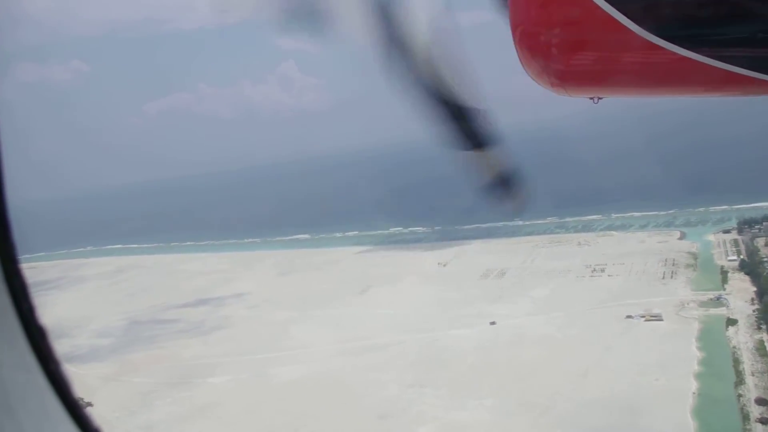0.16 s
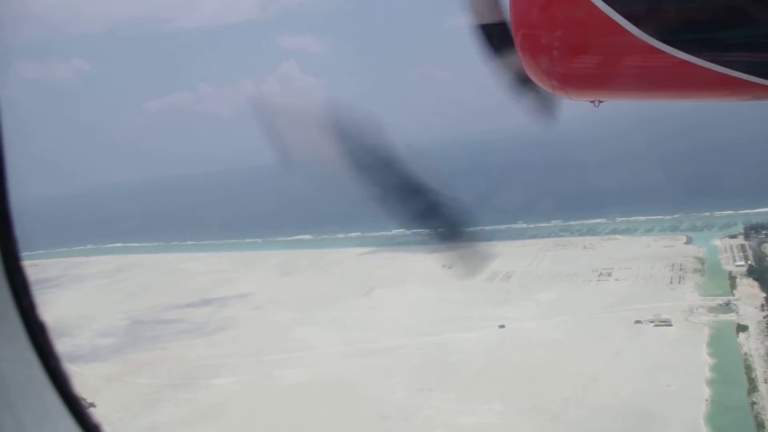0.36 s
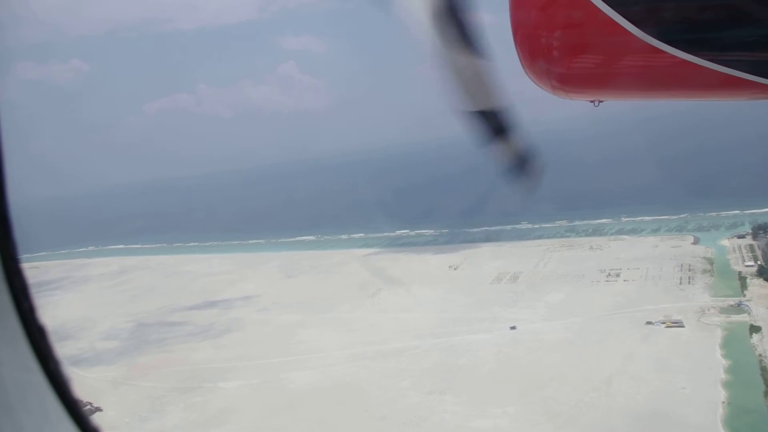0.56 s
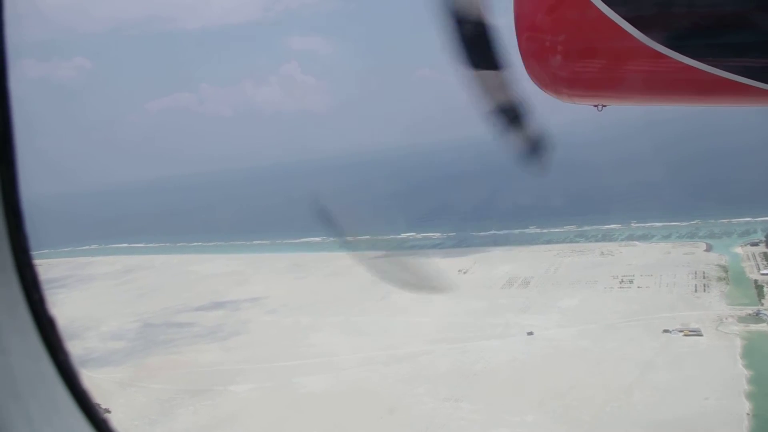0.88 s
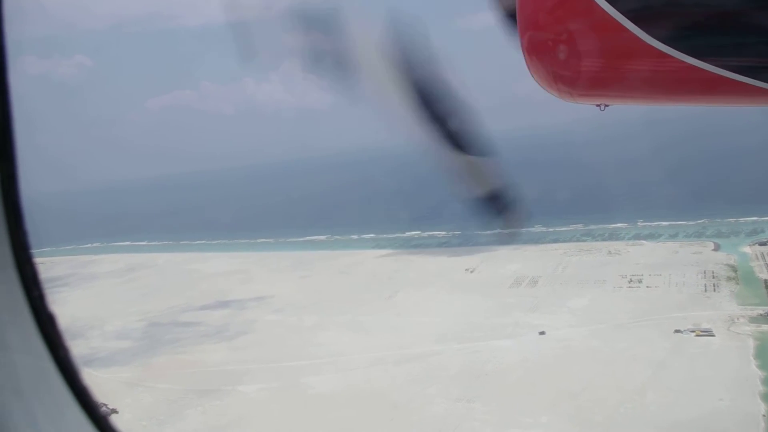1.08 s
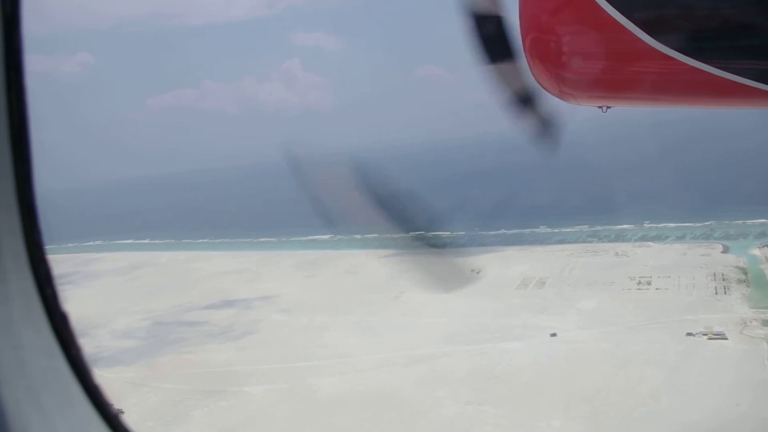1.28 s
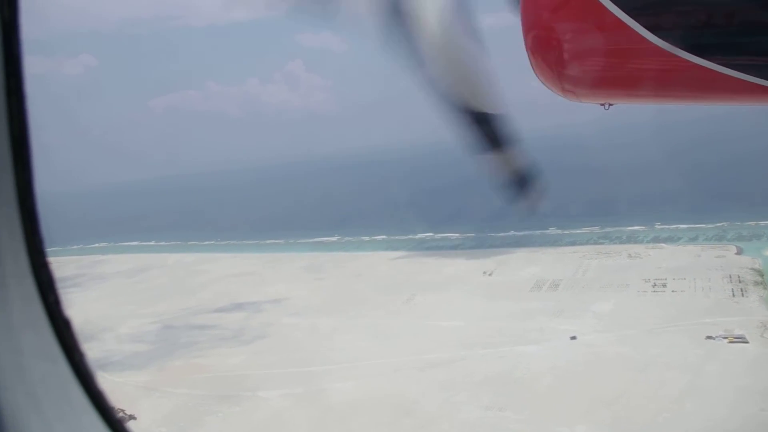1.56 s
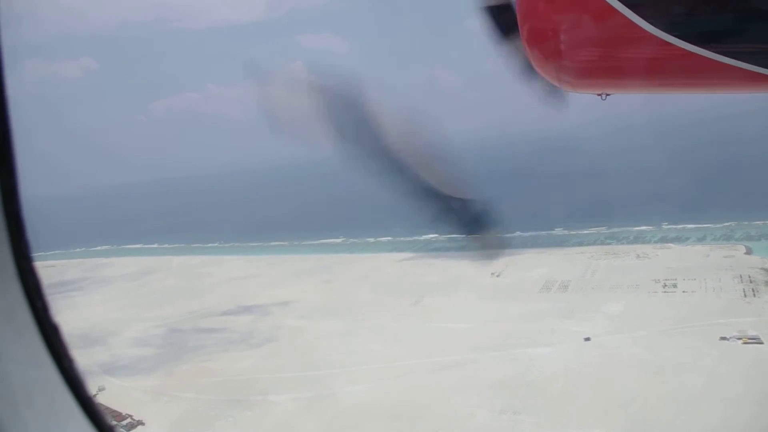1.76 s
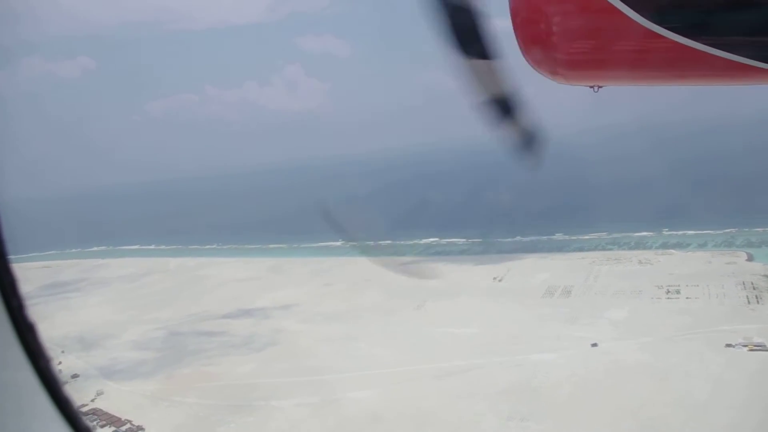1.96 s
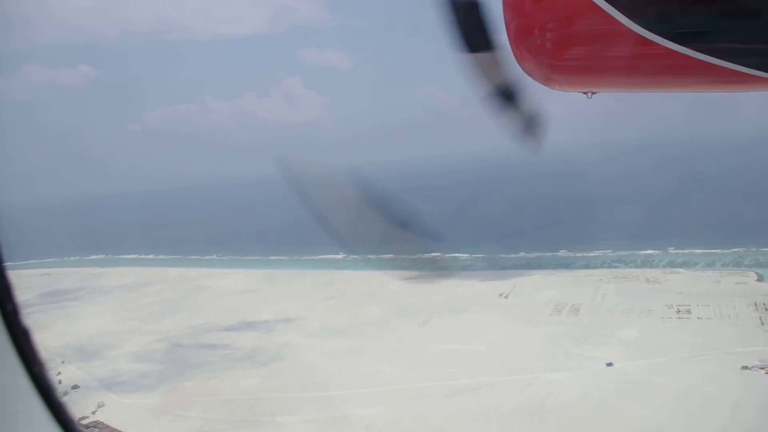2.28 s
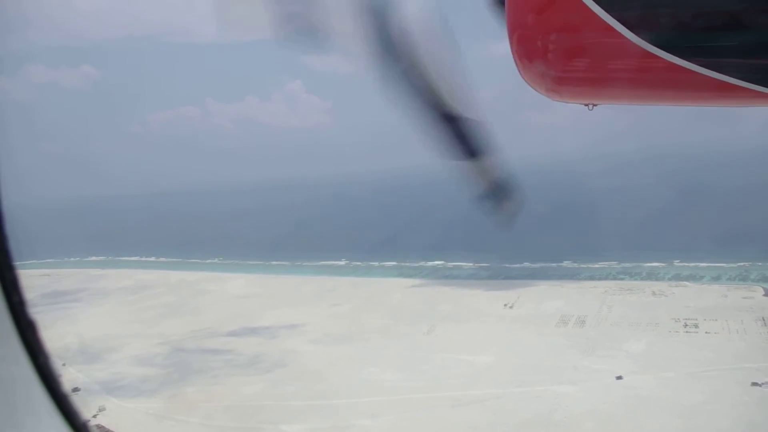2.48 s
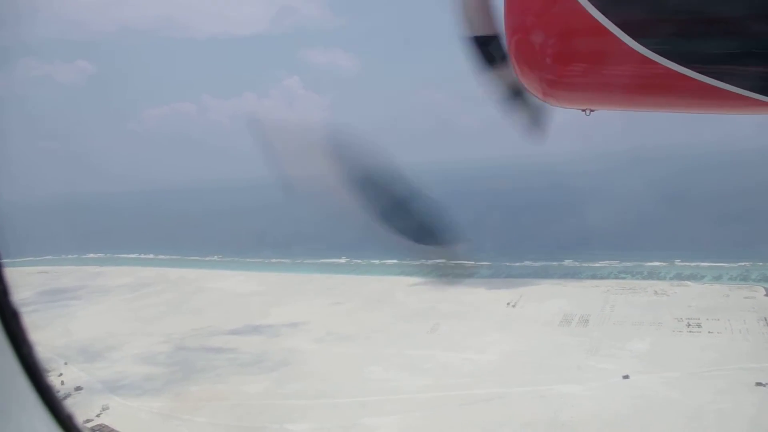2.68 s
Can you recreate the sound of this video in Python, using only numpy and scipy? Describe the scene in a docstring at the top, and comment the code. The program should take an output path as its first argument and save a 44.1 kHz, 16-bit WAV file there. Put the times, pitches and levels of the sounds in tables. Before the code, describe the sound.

Deep buzzing propeller engine hum fills a small plane in flight, under airy roar and faint high hiss

```python
"""A steady propeller drone fills the cabin of a small twin turboprop in flight: two three-bladed
propellers turn almost in step, as sums of sines at multiples of their shaft rates.
Blades of the near propeller slap the fuselage with suction spikes and puffs of noise. Shaped noise
makes the rush of air, which swells in steps and eases at the end. Gears sing faintly as wavering sines,
and the turbine whines and hisses high above as bands of noise with compressor tones."""
import sys
import numpy as np
from scipy import signal
from scipy.fft import rfft, irfft, next_fast_len
from scipy.io import wavfile
from scipy.ndimage import map_coordinates

SR = 44100
rng = np.random.default_rng(int(sys.argv[2]) if len(sys.argv) > 2 else 0)


def persist_wave(psi):
    """Save psi, clipped to +-1, as 16-bit WAV."""
    counts = np.round(np.clip(psi, -1, 1) * 32767).astype(np.int16)
    wavfile.write(sys.argv[1], SR, np.atleast_2d(counts).T)


N = 125244

NEAR_SHAFT_HZ, FAR_SHAFT_HZ = 29.02, 28.98
BLADES = 3


def amp(db):
    """Logarithmic level: decibels to amplitude gain."""
    return 10 ** (np.asarray(db) / 20)


def unit(x):
    """Normalisation of power: scale to rms 1."""
    return x / np.sqrt(np.mean(x ** 2) + 1e-20)


def curves(rows):
    """Linear interpolation: one value per sample for each column after the time."""
    s, *columns = np.transpose(rows)
    t = np.arange(N) / SR
    return [np.interp(t, s, column) for column in columns]


def wobble(rate):
    """Slow random modulation: a smooth curve through `rate` random knots a second."""
    knots = rng.standard_normal(1024)
    return map_coordinates(knots, [np.arange(N) * rate / SR], mode="wrap")


def filtered(x, response):
    """Linear filtering: the spectrum of x times a response of frequency."""
    m = next_fast_len(N + 8192)
    spectrum = rfft(x, m) * response(np.fft.rfftfreq(m, 1 / SR))
    return irfft(spectrum, m)[..., :N]


def noise(spectrum, gate=1, peaks=()):
    """Spectral shaping: gated white noise coloured by a level curve and resonances, at rms 1."""
    f, db = np.transpose(spectrum)

    def colour(hz):
        lift = sum(gain / (1 + (2 * (hz - centre) / width) ** 2) for centre, width, gain in peaks)
        return amp(np.interp(np.log(hz + 1), np.log(f), db) + lift)

    return unit(filtered(gate * rng.standard_normal(N), colour))


def sine(cycles):
    """Simple harmonic motion: a sine of rms 1 from its phase in cycles."""
    return np.sqrt(2) * np.sin(2 * np.pi * cycles)


def shaft(hz, since_s):
    """Governed rotation: turns made since a given moment, with a slight random sway."""
    sway_turns = .001 * wobble(4)
    return hz * (np.arange(N) / SR - since_s) + sway_turns


# level of the third blade tone, added to its listed level: t/s, level/dB
THIRD_BLADE_TONE = [(0, -1.5), (.45, -1), (1, -2.8), (1.27, -6), (1.55, -1.7), (2.1, -.5), (2.4, 1),
                    (2.75, 2.7)]
OVERTONES_FROM_HZ, OVERTONES_FOLLOW = 300, .7  # other tones above this gain this share of the airflow's swell
FLUTTER_DB = 0.3576  # random unsteadiness at order 6, growing as order squared
WALL_HZ = 220  # wall resonance


def propeller(turns, orders, swell_db):
    """Periodic blade loading gives harmonics of blade passing; unequal blades add weak shaft orders."""
    out = np.zeros(N)
    for order, db in orders:
        hz = order * NEAR_SHAFT_HZ
        if order == 3 * BLADES:
            rise_db = curves(THIRD_BLADE_TONE)[0]
        else:
            rise_db = OVERTONES_FOLLOW * (hz > OVERTONES_FROM_HZ) * swell_db
        flutter_db = FLUTTER_DB * (order / 6) ** 2 * wobble(9)
        # the wall's lag nears half a cycle above resonance, inverting the tone
        lag_cycles = np.arctan((hz / WALL_HZ) ** 4) / np.pi + 1 / 4
        out += amp(db + rise_db + flutter_db) * sine(order * turns - lag_cycles)
    return out


# tones of the near propeller: multiple of the shaft rate, level/dB
NEAR_PROPELLER_TONES = [(2, -68.5), (3, -32.5), (4, -53.5), (5, -52.5), (6, -58.5), (7, -83), (8, -63),
                        (9, -35), (10, -55.5), (12, -49), (15, -54)]
# tones of the far propeller: multiple of the shaft rate, level/dB
FAR_PROPELLER_TONES = [(3, -49.5), (6, -33.5), (15, -59)]


def drone(near_turns, far_turns, swell_db):
    """Superposition: the tones of the two propellers add and beat slowly."""
    near = propeller(near_turns, NEAR_PROPELLER_TONES, swell_db)
    return near + propeller(far_turns, FAR_PROPELLER_TONES, swell_db)


# colour of the slap noise: f/Hz, relative level/dB
SLAP_COLOUR = [(150, -16), (400, 5.5), (900, -7), (1800, -11), (3200, -15.5), (5200, -21), (8000, -23.5),
               (15000, -42)]
SLAP_DB, SLAP_DECAY_S = -55.5, 0.00065
SLAP_SCATTER_DB, STRONG_BLADE_DB = 3, 4
SLAP_JITTER_S = .00016  # turbulence makes each slap early or late
SPIKE_DB, SPIKE_RISE_S, SPIKE_FALL_S, SPIKE_LOW_HZ = -33.5, .00005, 0.00034, 294


def wake_slaps(turns):
    """Impulsive loading: each blade gives a suction spike and a noise puff; one blade hits harder."""
    passes = BLADES * (turns + SLAP_JITTER_S * NEAR_SHAFT_HZ * wobble(90))
    index = np.floor(passes).astype(int)
    age_s = passes % 1 / (BLADES * NEAR_SHAFT_HZ)
    scatter_db = SLAP_SCATTER_DB * np.clip(rng.standard_normal(512), -2, 1)[index]
    size = amp(scatter_db + STRONG_BLADE_DB * (index % BLADES == 0))
    spike = -size * (1 - np.exp(-age_s / SPIKE_RISE_S)) * np.exp(-age_s / SPIKE_FALL_S)
    highpass = signal.butter(2, SPIKE_LOW_HZ, "high", fs=SR, output="sos")
    spike = signal.sosfilt(highpass, spike)
    puff = noise(SLAP_COLOUR, size * np.exp(-age_s / SLAP_DECAY_S))
    return amp(SPIKE_DB) * spike + amp(SLAP_DB) * puff


# colour of the cabin rumble: f/Hz, relative level/dB
RUMBLE_COLOUR = [(15, -39), (48, -19.5), (75, -12), (130, -1), (210, 4), (300, 1), (420, -3.5), (600, -15),
                 (1200, -62), (4000, -100)]
# colour of the air rush: f/Hz, relative level/dB
RUSH_COLOUR = [(150, -31), (330, -0.5), (480, 1), (680, -1), (1050, -6.5), (1400, -7), (1800, -10.5),
               (2200, -13.5), (3000, -16.5), (4200, -20.5), (5200, -21.5), (6500, -24.5), (9000, -25),
               (15000, -29)]
# cabin panel resonances that colour the rush: f/Hz, width/Hz, lift/dB
PANEL_RESONANCES = [(400, 28, 2.5), (827, 69, 6.5), (957, 45, 6), (1205, 60, 3.5), (1684, 28, 5),
                    (2470, 160, 5), (3440, 230, 2)]
RUMBLE_DB, RUSH_DB = -40, -44
RUMBLE_FOLLOWS, RUSH_FOLLOWS = 1.33, 1.63  # dB per dB of airflow


def slipstream(swell_db):
    """Turbulent boundary-layer pressure on the skin: a cabin rumble and a brighter rush."""
    rumble = amp(RUMBLE_DB + RUMBLE_FOLLOWS * swell_db) * noise(RUMBLE_COLOUR)
    rush_db = RUSH_DB + RUSH_FOLLOWS * swell_db + 0.61 * wobble(40.1)
    rush = amp(rush_db) * noise(RUSH_COLOUR, peaks=PANEL_RESONANCES)
    return rumble + rush


TONE_WANDER_HZ, TONE_FLUTTER_DB = 2.8, 4.5  # random pitch scale; limit of the level flutter


def tones(table):
    """Frequency and amplitude modulation: machine tones that waver slightly in pitch and level."""
    out = np.zeros(N)
    for hz, db in table:
        flutter_db = TONE_FLUTTER_DB * np.tanh(wobble(12.3))
        cycles = np.cumsum(hz + TONE_WANDER_HZ * wobble(15)) / SR
        out += amp(db + flutter_db) * sine(cycles)
    return out


# steady tones of the gears: f/Hz, level/dB
GEAR_SINES = [(1798, -68), (2470, -74), (2921, -77.5)]


def gears():
    """Tonal radiation: the gears sing as a few faint sines."""
    return tones(GEAR_SINES)


# course of the turbine, before the offsets below: t/s, whine level/dB, hiss level/dB
TURBINE_COURSE = [(0, -63, -57.8), (.7, -64, -57.7), (1.05, -62.5, -56.8), (1.35, -60, -54.4),
                  (1.75, -55, -53.7), (2, -55.8, -52.6), (2.35, -57.5, -52.6), (2.6, -56, -53.2),
                  (2.84, -59.5, -55)]
# colour of the whine: f/Hz, relative level/dB
WHINE_COLOUR = [(8000, -32), (8950, -24), (9250, -4), (9480, 0), (9680, 3), (9950, -6), (10400, -17),
                (11500, -43), (14000, -90)]
# colour of the exhaust hiss: f/Hz, relative level/dB
HISS_COLOUR = [(7000, -26), (9500, -9.5), (10500, -7.5), (11600, -2), (12600, 0.5), (13400, -3),
               (14300, -20), (15700, -38)]
# steady tones of the compressor: f/Hz, level/dB
COMPRESSOR_SINES = [(9453, -69.5), (9539, -71), (9685, -74)]
WHINE_DB, HISS_DB = 1, 0.5  # offsets
HISS_FLUTTER_DB, HISS_CHOP = 0.3, .1  # each passing blade chops the hiss by this share


def turbine(turns):
    """Narrow-band and broad-band noise: a whine holding compressor tones, and a blade-chopped hiss."""
    whine_db, hiss_db = curves(TURBINE_COURSE)
    whine = amp(WHINE_DB + whine_db + 0.65 * wobble(18)) * noise(WHINE_COLOUR)
    chop = 1 + HISS_CHOP * np.cos(2 * np.pi * BLADES * turns)
    hiss_gain = amp(HISS_DB + hiss_db + HISS_FLUTTER_DB * wobble(25.6))
    hiss = hiss_gain * chop * noise(HISS_COLOUR)
    return whine + hiss + tones(COMPRESSOR_SINES)


# airflow along the fuselage, used as departures from its mean: t/s, level/dB
AIRFLOW_COURSE = [(0, -44), (.5, -44), (1, -44), (1.35, -42), (1.65, -41.5), (1.9, -41), (2.3, -40.5),
                  (2.6, -40.5), (2.84, -42.5)]
# the near governor hunts slightly: t/s, shaft rate offset f/Hz
GOVERNOR_HUNTING = [(1, 0), (1.3, .09), (1.6, 0), (1.95, -.07), (2.2, 0), (2.6, .08), (2.84, .04)]
STRONG_BLADE_S = .7972  # a nominal passing of the near propeller's strong blade
FAR_OPPOSED_S = 1.13  # when the far blades nominally fall just between the near ones


def scene():
    """Superposition of all sources, as heard at a window seat."""
    air_db, = curves(AIRFLOW_COURSE)
    swell_db = air_db - air_db.mean()
    hunting_turns = np.cumsum(curves(GOVERNOR_HUNTING)[0]) / SR
    near = shaft(NEAR_SHAFT_HZ, STRONG_BLADE_S) + hunting_turns
    # the near shaft's nominal angle at that moment, plus half a blade spacing
    far_start_turns = NEAR_SHAFT_HZ * (FAR_OPPOSED_S - STRONG_BLADE_S) + .5 / BLADES
    far = shaft(FAR_SHAFT_HZ, FAR_OPPOSED_S) + far_start_turns
    propellers = drone(near, far, swell_db) + wake_slaps(near)
    return (propellers + slipstream(swell_db) + gears() + turbine(near))[None]


TOP_HZ = 15680


def record(dry):
    """Band limitation: nothing passes at or above the top frequency."""
    return filtered(dry, lambda hz: hz < TOP_HZ)


dry = scene()
out = record(dry)
persist_wave(out)
```